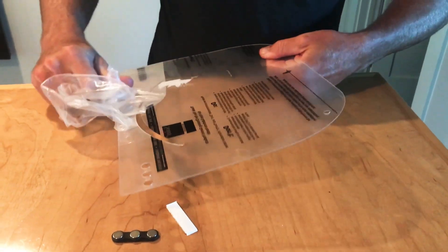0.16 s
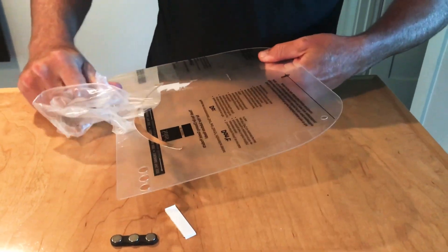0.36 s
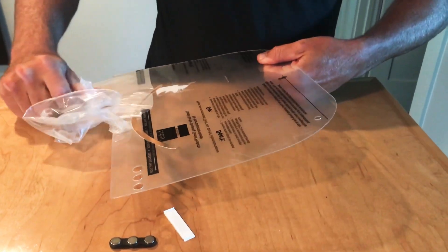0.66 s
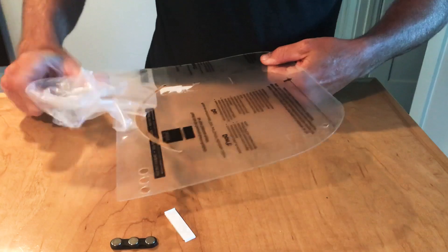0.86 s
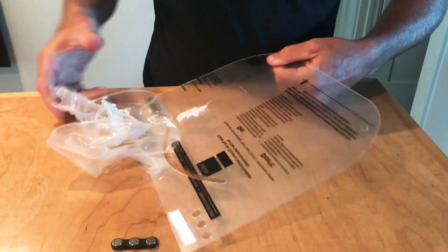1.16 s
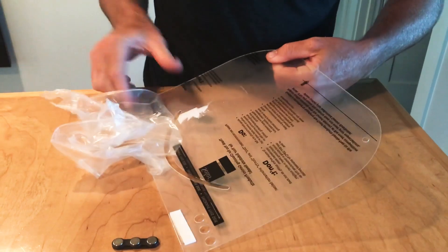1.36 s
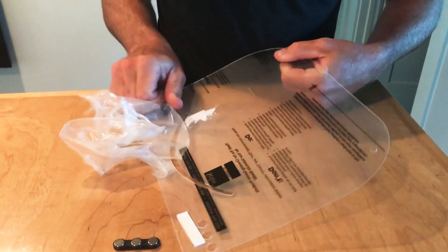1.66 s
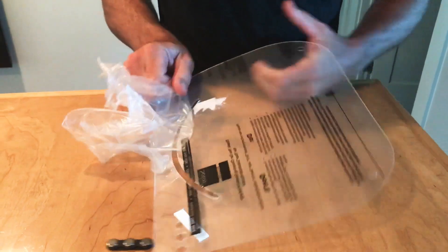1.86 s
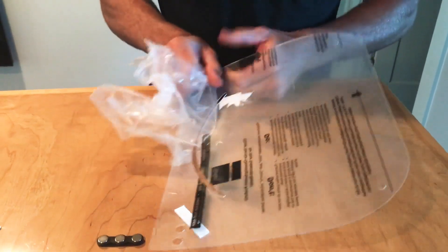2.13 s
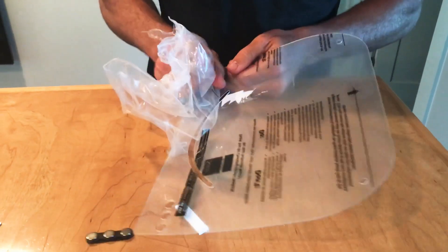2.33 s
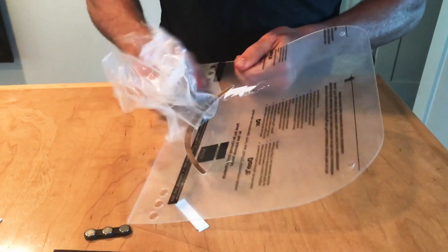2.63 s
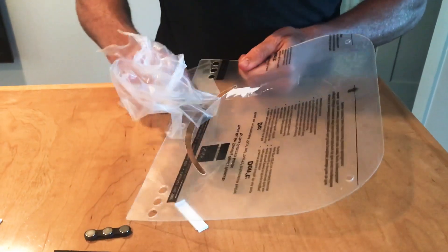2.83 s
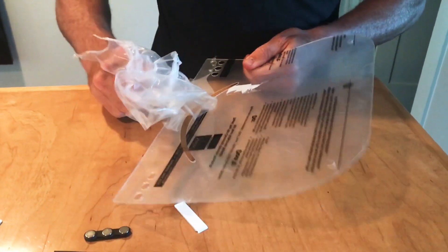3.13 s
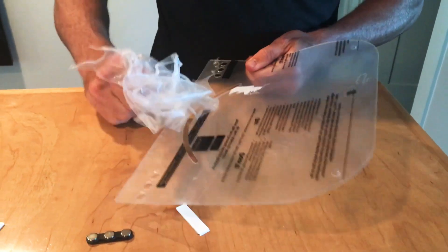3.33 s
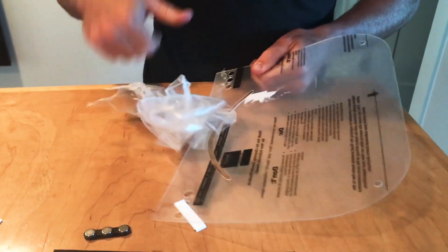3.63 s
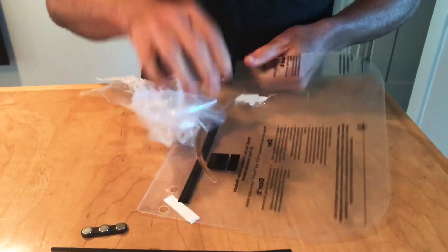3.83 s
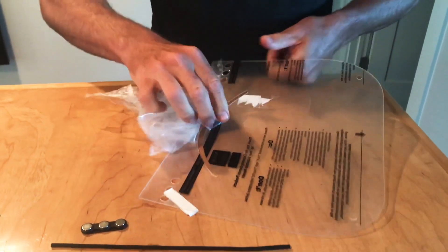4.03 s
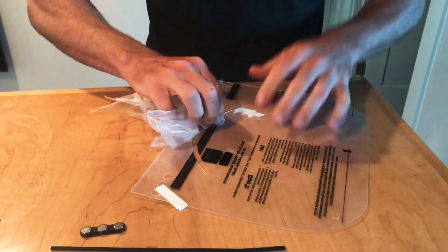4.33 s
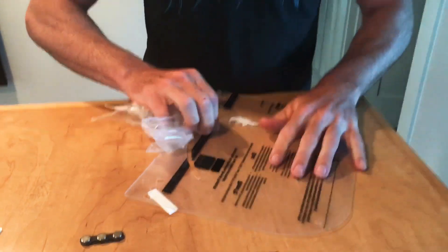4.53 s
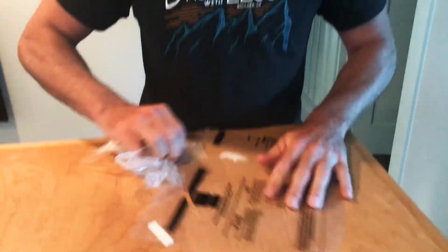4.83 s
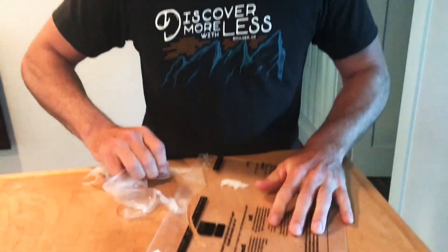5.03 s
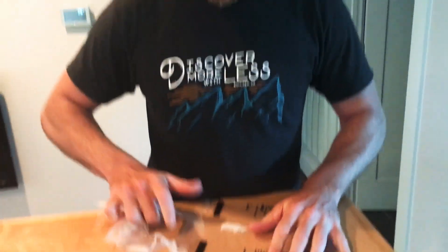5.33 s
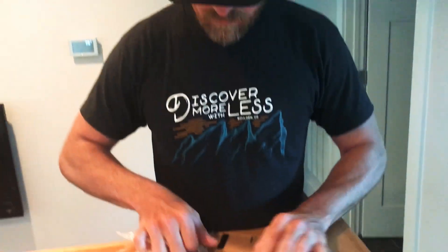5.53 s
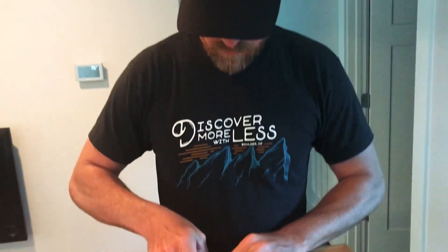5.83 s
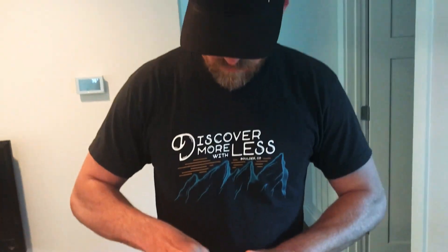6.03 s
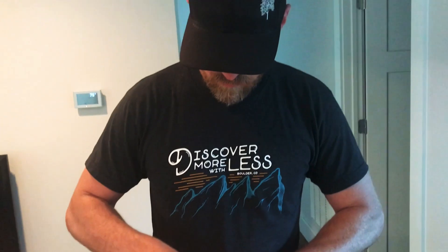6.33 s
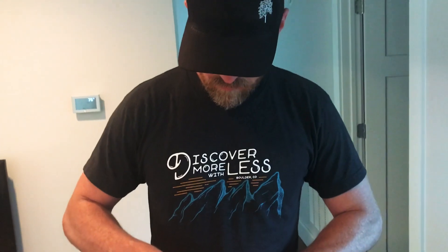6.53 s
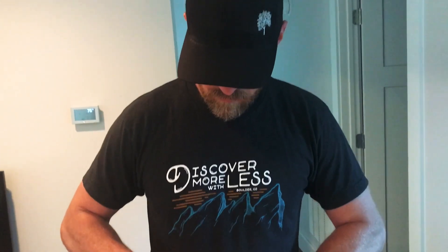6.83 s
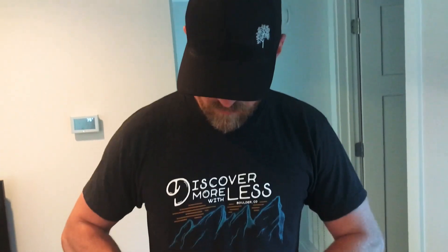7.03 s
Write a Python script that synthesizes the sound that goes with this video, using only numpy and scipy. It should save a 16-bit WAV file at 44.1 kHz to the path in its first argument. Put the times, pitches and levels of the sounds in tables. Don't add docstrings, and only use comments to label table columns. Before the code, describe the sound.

Thin film is peeled from a stiff plastic sheet, close to the microphone in a small quiet room. Bright snaps and hollow pops come first, then a sparser change of grip with one longer tear and hard sharp tugs. The sheet is laid on a wooden table and sounds drier; a dense crackling pull follows, then light scattered picking, with faint thuds beneath.

```python
import sys
import numpy as np
from scipy import signal
from scipy.fft import rfft, irfft, next_fast_len
from scipy.io import wavfile
from scipy.ndimage import uniform_filter1d

SR = 44100
rng = np.random.default_rng(int(sys.argv[2]) if len(sys.argv) > 2 else 0)


def rack_gain(trim_db):
    fader = np.asarray(trim_db, float)
    return 10 ** (fader / 20)


def master_out(mix):
    frames = np.transpose(np.atleast_2d(mix))
    ceiling = np.clip(frames, -1, 1)
    pcm = np.round(ceiling * 32767).astype(np.int16)
    wavfile.write(sys.argv[1], SR, pcm)


N = 316638
LAID_S = 3.85


def evened(x):
    return x / np.sqrt(np.mean(x ** 2) + 1e-20)


def read(points, hz):
    f, value = np.transpose(points)
    return np.interp(np.log(hz + 1), np.log(f + 1), value)


def add(mix, s, sound):
    part = mix[round(s * SR):][:len(sound)]
    part += sound[:len(part)]


def coloured(x, db_of_hz):
    size = next_fast_len(len(x))
    gain = rack_gain(db_of_hz(np.fft.rfftfreq(size, 1 / SR)))
    return irfft(rfft(x, size) * gain, size)[:len(x)]


def hump(hz, centre, width):
    return np.exp(-(np.log(hz / centre + 1e-3) / width) ** 2)


def burst(db_of_hz, t60_ms, rise_ms, lumps_db, spike_db, size):
    ms = np.arange(4096) * 1000 / SR - 2
    noise, lumps = rng.standard_normal((2, 4096))
    lumps = evened(uniform_filter1d(lumps, size))
    decay = rack_gain(-60 * np.maximum(ms, 0) / max(t60_ms, 2) + lumps_db * lumps)
    creep = rack_gain(-36.0) * np.clip(ms / 2 + 1, 0, 1)
    onset = np.maximum(np.clip(ms / rise_ms, 0, 1), creep)
    spike = rack_gain(spike_db * np.exp(-(ms - rise_ms) ** 2 / 0.53 ** 2))
    x = coloured(noise, db_of_hz) * decay * onset * spike
    return x / np.sqrt(uniform_filter1d(x ** 2, 66).max())


def grains(low_hz, high_hz, per_s, spread_db, ms, width, clump_db, count):
    slow = uniform_filter1d(uniform_filter1d(rng.standard_normal(N), 300), 300)
    clump = rack_gain(clump_db * evened(slow))
    size = rack_gain(spread_db * np.minimum(rng.exponential(1, N), 4.5))
    size = size * (rng.random(N) < clump * per_s / SR)
    kind, out = rng.integers(0, count, N), np.zeros(N)
    time_ms = np.arange(768) * 1000 / SR
    for k, centre in enumerate(np.geomspace(low_hz, high_hz, count)):
        noise = coloured(rng.standard_normal(768),
                         lambda hz: -9 * (np.log(hz / centre + 1e-3) / width) ** 2)
        step = time_ms / (ms * rng.uniform(0.049, 4.13))
        rasp = noise * step * np.exp(-step)
        rasp = rasp / np.linalg.norm(rasp) * np.sqrt(centre)
        out += signal.oaconvolve(size * (kind == k), rasp)[:N]
    return out


# (frequency [Hz], level [dB])
FILM_COLOUR = [(500, -1), (1500, 3), (3500, 1), (6000, 0.5), (9000, -0.5), (13000, -2.5), (16000, -3.5)]
# (time [s], peak level [dB], treble share [dB], resonance [Hz])
FIRST_PULL = [(0.0054, -20, -24, 4370), (0.03, -22, -16, 6550), (0.0592, -11.5, -26, 6700),
              (0.174, -22.5, -8, 9200), (0.181, -24.5, -9, 3340), (0.2127, -23, -14, 4560),
              (0.23, -21.5, -12, 4140), (0.2348, -21.5, -12, 4200), (0.263, -24, -15, 5600),
              (0.2973, -13, -16.5, 9500), (0.3248, -18.5, -14, 3630), (0.338, -31, -6, 6000),
              (0.355, -28, -16, 3400), (0.4184, -30, -12, 3320), (0.5063, -29.5, -14, 3210),
              (0.5517, -19, -27, 2860), (0.564, -27, -20, 4600), (0.616, -20.5, -11, 2580),
              (0.6612, -19.5, -15, 6700), (0.7228, -24, -12, 4600), (0.752, -12.5, -7, 3230),
              (0.812, -18, -14, 4610), (0.8382, -11, -22, 4400), (0.876, -28, -35, 6360),
              (0.951, -19.5, -17, 3880), (0.971, -29, -10, 6270), (1.004, -20.5, -9, 4260),
              (1.0154, -15, -14, 3400), (1.0732, -27.5, -18, 3900), (1.107, -25.5, -8, 6020),
              (1.147, -24, -25, 5830), (1.3262, -29.5, -15, 3460)]
REGRIP = [(1.3585, -34, -2, 3890), (1.3743, -38, -11, 2640), (1.474, -27, -10, 4500),
          (1.504, -28.5, -18, 3140), (1.5212, -26.5, -21, 2390), (1.5376, -23, -11, 5800),
          (1.543, -25, -8, 6150), (1.609, -23, -12, 5390), (1.631, -21, -21, 3520),
          (1.6496, -24.5, -24, 4000), (1.681, -24.5, -31, 3530), (1.6867, -27, -20, 3430),
          (1.815, -26, -16, 3500), (1.8863, -15.5, -24, 3500), (1.894, -16, -26, 3400),
          (1.915, -22.5, -33, 3320), (1.9295, -28, -19, 3950), (1.9505, -23.5, -23, 3460),
          (1.964, -22, -15, 3090), (1.977, -29, -26, 3870), (1.9942, -26, -24, 3920),
          (2.0146, -25, -19, 2700), (2.0579, -20.5, -8, 2650), (2.071, -27, -21, 3000),
          (2.1076, -32, -19, 2730), (2.123, -20.5, -9, 3600), (2.1507, -26, -9, 9520),
          (2.2052, -23, -21, 5500), (2.2397, -35, -21, 6550), (2.2408, -29, -17, 6830),
          (2.379, -32, -23, 5840), (2.3882, -32, 0, 6780), (2.4114, -31, -12, 6400), (2.4333, -39, 7, 6060)]
TEAR = [
    (1.7317, -12, -26, 3520),
    (1.739, -20.5, -41, 5900),
    (1.748, -26.5, -50, 3460),
]
TUGS = [(2.449, -31, -14, 5000), (2.4573, -9, -25, 5230), (2.4633, -7, -7, 5460), (2.48, -19, -5, 4280),
        (2.497, -22, -4, 8000), (2.61, -38, -3, 11500), (2.631, -7.5, -9.5, 3050), (2.6411, -9.5, -3, 2800),
        (2.687, -21, -18, 4060), (2.727, -29, -29, 3600), (2.805, -23.5, -24, 2280),
        (2.8537, -20, -28, 2210), (2.867, -17, -6, 6200), (2.873, -21, -23, 7200), (2.8965, -14, -15, 2820),
        (3.006, -18.5, -8, 3180), (3.02, -16, -7, 7080), (3.0726, -15, -3, 8050), (3.0975, -24, -15, 4050),
        (3.208, -28, -16, 5300), (3.247, -23.5, -10, 4560), (3.2713, -21, -9, 6980),
        (3.2999, -29, -11, 3180), (3.372, -31, -11, 3300), (3.392, -27, -5, 4020), (3.446, -29, -7, 3500),
        (3.479, -16, -9, 5940), (3.52, -39, -11, 3530), (3.633, -25.5, -11.5, 3700)]
LAYING = [(3.809, -26, -16, 6640), (3.8154, -29, -20, 6200), (3.8386, -31, 4, 8300),
          (3.8698, -16, -5, 5970), (3.8863, -14.5, -27, 8400), (3.8995, -19.5, -16, 3820),
          (3.9242, -13.5, -11, 9000), (3.9414, -23, -14, 3060), (3.9658, -20.5, -25, 5600),
          (3.9876, -19, -14, 2900), (4.0088, -19.5, -13, 8180), (4.033, -14, -8, 11100),
          (4.0459, -18, -9, 8550), (4.07, -20.5, -13, 2970), (4.0907, -26, -21, 3800),
          (4.1102, -26, -17, 2860), (4.1202, -24, -16, 4000), (4.1324, -24, -17, 6350),
          (4.1426, -14.5, -5, 3950), (4.1684, -26, -14, 2750), (4.189, -24.5, -14, 2970),
          (4.228, -22, -9, 12500), (4.2418, -23, -2, 3000), (4.2772, -23.5, -28, 2900),
          (4.3095, -32, -6, 4040), (4.3333, -25, -23, 2800), (4.381, -27, -17, 2940),
          (4.4148, -24, -1, 10260), (4.4228, -29, -16, 6300), (4.439, -26, -22, 2900),
          (4.4867, -28, -11, 13400), (4.4994, -28, -17, 3920), (4.52, -35, -29, 2770),
          (4.532, -30, -4, 9000), (4.5496, -25.5, -25, 2980), (4.567, -23, -8.5, 2770),
          (4.589, -25.5, -18, 3040)]
LONG_PULL = [(4.6143, -28, -13, 2830), (4.6272, -19.5, -25, 3000), (4.65, -14.5, 2, 3040),
             (4.6603, -11, -2, 8500), (4.676, -24, -12, 3800), (4.705, -15, -16, 6460),
             (4.7296, -15.5, -19, 5200), (4.7498, -17.5, -24, 4080), (4.7724, -11.5, -37, 3100),
             (4.7863, -18, -30, 2990), (4.799, -17, -22, 2950), (4.8375, -16, -11, 9450),
             (4.853, -8, -11, 3000), (4.865, -13.5, -15, 2880), (4.871, -12.5, -27, 2760),
             (4.8834, -13, -28, 2730), (4.894, -19, -23, 2850), (4.9096, -16, -17, 2000),
             (4.9449, -12, -6, 6250), (4.9836, -19, -14, 6700), (5.005, -18, -13, 3300),
             (5.024, -19, -22, 2700), (5.0429, -12, -10, 8480), (5.057, -31, -14, 3240),
             (5.069, -16, -19, 3070), (5.079, -17.5, -24, 6440), (5.115, -13, -14, 3600),
             (5.146, -22, -23, 4000), (5.1783, -15.5, -8, 6100), (5.207, -13, -12, 3380),
             (5.2123, -11, -6, 3400), (5.3325, -18, -11, 3200)]
PICKING = [(5.399, -23.5, -5, 6530), (5.417, -21, -5, 3000), (5.444, -32, -2, 4270),
           (5.507, -21, -10, 12400), (5.52, -20, -24, 13000), (5.5478, -30, -7, 13400),
           (5.5697, -29.5, -9, 3240), (5.648, -26.5, -21, 12200), (5.674, -30, -10, 5650),
           (5.69, -27, -16, 4030), (5.7024, -28.5, -9, 10100), (5.7123, -22, -9, 6020),
           (5.735, -20.5, -16, 6600), (5.7656, -21.5, 2, 6440), (5.7828, -25, -13, 3940),
           (5.798, -22.5, -14, 2080), (5.8467, -26, -4, 3540), (5.8566, -24.5, -23, 3860),
           (5.894, -30, -26, 3640), (5.954, -29.5, -24, 3100), (5.97, -25.5, -3, 3300),
           (5.9914, -25, 1, 2640), (6.008, -19.5, 17, 13100), (6.024, -33, -19, 3410),
           (6.0614, -29, -4, 4070), (6.0821, -24, -14, 3220), (6.115, -31, -30, 2040),
           (6.1603, -30, -32, 3750), (6.177, -24, -21, 9590), (6.19, -21, 1, 9900),
           (6.2118, -27, -18.5, 4200), (6.25, -28.5, -13, 3360), (6.296, -35, -29, 3305)]
LAST_PICKS = [(6.3487, -25.5, -42, 2040), (6.3595, -31, -23, 3170), (6.398, -21, -10, 13600),
              (6.4104, -21, -13, 13600), (6.4232, -23, -23, 6600), (6.499, -20, -19, 3740),
              (6.515, -23, -20, 3500), (6.595, -23.5, -9, 7100), (6.684, -30, -13, 7180),
              (6.71, -31.5, -14, 6000), (6.748, -28, -5, 2860), (6.767, -25, -10, 3740),
              (6.8261, -14, -19.5, 11100), (6.8555, -28, -8, 13800), (6.926, -30, -19, 2080),
              (6.938, -25, -17, 5520), (6.9532, -25, -8, 3200), (6.9978, -28.5, -14, 13400),
              (7.0533, -40, -27, 3700), (7.0724, -29, -27, 4090), (7.093, -22, -16, 2920),
              (7.1174, -23.5, -11, 3780), (7.146, -25.5, -19, 2980), (7.1518, -16, -10, 3160)]


def snaps():
    held_t60_ms, flat_t60_ms, tear_t60_ms = 22.3, 16.7, 68
    out = np.zeros(N)
    for creases in (FIRST_PULL, REGRIP, TEAR, TUGS, LAYING, LONG_PULL, PICKING, LAST_PICKS):
        for s, db, treble_db, centre in creases:
            t60_ms = held_t60_ms if s < LAID_S else flat_t60_ms
            if creases is TEAR:
                t60_ms = tear_t60_ms

            def colour(hz):
                tilt = 0.35 * (treble_db + 12.0) * np.tanh(np.log(hz / 7000 + 1e-3) / 0.31)
                resonance = 7 * np.exp(-(np.log(hz / centre + 0.0011) / 0.11) ** 2)
                bass_loss = 4.2 * np.maximum(np.log(1.25 * centre / (hz + 1)), 0)
                return read(FILM_COLOUR, hz) + tilt + resonance - bass_loss

            fall_ms, rise_ms = t60_ms * rng.uniform(0.64, 1.92), rng.uniform(0.13, 0.21)
            snap = burst(colour, fall_ms, rise_ms, lumps_db=3.2, spike_db=6.1, size=30)
            add(out, max(s - 0.002, 0), rack_gain(db) * snap)
    return rack_gain(-10.5) * out


# (frequency [Hz], level [dB])
SHEET_COLOUR = [(250, -23), (540, -0.5), (680, -3.5), (1000, -2.5), (1500, -3), (2000, -11), (4000, -26.5)]
# (time [s], peak level [dB], centre [Hz], ring t60 [ms])
HELD_POPS = [(0.002, -31.5, 742, 120), (0.043, -27, 709, 45), (0.049, -21, 717, 54), (0.18, -37.5, 693, 77),
             (0.212, -32.5, 1500, 34), (0.233, -31, 720, 22), (0.273, -24, 705, 34),
             (0.287, -24.5, 648, 23), (0.417, -32, 1430, 9.7), (0.551, -35.5, 1580, 21),
             (0.614, -28.5, 1420, 61), (0.712, -33, 765, 49), (0.752, -21, 942, 26),
             (0.831, -23.5, 1280, 26), (0.845, -26, 708, 27), (0.88, -28.5, 720, 59),
             (0.898, -25, 1470, 48), (1.02, -26.5, 1186, 42), (1.373, -36.5, 784, 32),
             (1.7313, -13.5, 1015, 103), (1.888, -18, 1020, 7.9), (1.893, -20, 1035, 35),
             (1.915, -33, 920, 12), (1.951, -24.5, 750, 17), (1.964, -23, 830, 8.1), (1.98, -26.5, 810, 16),
             (2.126, -28, 1280, 26), (2.272, -25, 1006, 35), (2.342, -34.5, 1047, 150),
             (2.458, -18, 1180, 7.7), (2.4642, -16, 699, 26), (2.632, -7, 1340, 15), (2.636, -12, 1079, 51),
             (2.64, -12.5, 732, 41), (2.661, -22, 870, 27), (2.854, -27, 720, 67), (2.896, -20, 1260, 40),
             (3.007, -34, 727, 93), (3.02, -26, 1170, 33), (3.481, -21, 1020, 27)]
# (time [s], peak level [dB], centre [Hz], ring t60 [ms])
FLAT_POPS = [
    (3.925, -28.5, 1270, 15),
    (4.365, -36, 1240, 90),
    (4.87, -25, 1426, 220),
    (4.946, -21, 1590, 8.4),
    (5.024, -32, 1670, 180),
    (5.644, -30.5, 963, 80),
    (6.927, -31, 1088, 30),
    (7.146, -27.5, 1540, 27),
]


def pops():
    out, t = np.zeros(N), np.arange(4096) / SR
    for s, db, centre, t60_ms in [*HELD_POPS, *FLAT_POPS]:
        def colour(hz):
            mode = (7 - 2.0 * np.log2(centre / 1000)) * hump(hz, centre, 0.21)
            bass_loss = 45 * np.maximum(np.log(0.64 * centre / (hz + 1)), 0)
            return read(SHEET_COLOUR, hz) + mode - bass_loss

        pop = burst(colour, t60_ms, rise_ms=0.28, lumps_db=6.65, spike_db=3.1, size=120)
        add(out, max(s - 0.002, 0), rack_gain(db) * pop)
        fade = np.minimum(t / 0.0025, 1) * rack_gain(-60 * t * 1000 / (3.3 * t60_ms))
        ring_db = db - 16 * np.log2(centre / 700) - 2.5
        add(out, s, rack_gain(ring_db) * np.sin(2 * np.pi * centre * t) * fade)
    return rack_gain(-8.0) * out


# (time of hardest pull [s], crackle level [dB], length [s], sheet share [dB])
STROKES = [(0.044, -27.5, 0.19, -9.5), (.33, -50.5, 0.5, -2), (0.69, -45.5, 0.25, -6.5),
           (0.893, -27.5, 0.21, -8), (1.096, -46.5, 0.34, -4.5), (1.364, -44.5, 0.15, -41),
           (1.647, -51.5, 0.32, 3), (1.854, -47.5, 0.13, 6), (2.096, -56.5, 1, 4),
           (2.513, -39.5, 0.11, -34), (2.724, -49, 0.39, 5), (3.073, -40, 0.039, 6),
           (3.463, -33.5, 0.13, -10), (3.588, -49.5, 0.13, -4), (4.028, -38, 0.26, -6.5),
           (4.19, -64.5, 0.39, 20.5), (4.39, -53.5, 0.34, 6.5), (4.718, -42.5, 0.29, -2.5),
           (4.883, -26.5, 0.27, -7), (5.056, -30.5, 0.059, -0.5), (5.178, -33, 0.39, -6),
           (5.556, -41.5, 0.69, -4.5), (5.998, -46, 0.37, 2), (6.204, -43, 0.074, 2),
           (6.46, -44.5, 0.81, -6), (6.8, -55, 0.26, 2), (6.967, -62.5, 0.11, 15.5),
           (7.139, -36, 0.35, -6.5)]


def strokes():
    rest_db, fall_db, swell_share = -63, -17, 0.56
    t = np.arange(0, N + 64, 64) / SR
    film, sheet = rack_gain(rest_db), rack_gain(rest_db)
    for s, db, length, sheet_db in STROKES:
        before, after = (s - t) / (swell_share * length), (t - s) / ((1 - swell_share) * length)
        away = np.maximum(before, after) ** 1.5
        film = film + rack_gain(db + fall_db * away)
        sheet = sheet + rack_gain(db + sheet_db + fall_db * away)
    return [np.interp(np.arange(N) / SR, t, level) for level in (film, sheet)]


def table_echo(film):
    wide = np.clip(0.5 + evened(uniform_filter1d(rng.standard_normal(N), 1500)), 0, 1)
    low, high = (coloured(film, lambda hz: -220 * np.log(hz / gap_hz + 1e-3) ** 2 - 2.5)
                 for gap_hz in (2900, 3750))
    return (np.arange(N) > LAID_S * SR) * (wide * low + (1 - wide) * high)


def crackle():
    film_level, sheet_level = strokes()
    film = grains(1440, 20000, per_s=1000, spread_db=3.2, ms=0.28, width=0.7, clump_db=6.5, count=16)
    crinkles = grains(2000, 20000, per_s=200, spread_db=2.3, ms=0.78, width=0.73, clump_db=5.0, count=12)
    sheet = grains(1880, 2600, per_s=500, spread_db=3.2, ms=0.49, width=0.99, clump_db=2.5, count=10)
    drum = grains(665.0, 768, per_s=62, spread_db=3.4, ms=14.0, width=0.037, clump_db=5.0, count=5)
    film, crinkles = (evened(coloured(x, lambda hz: read(FILM_COLOUR, hz))) for x in (film, crinkles))
    sheet = evened(coloured(sheet, lambda hz: read(SHEET_COLOUR, hz)))
    drum = evened(drum * (np.arange(N) < LAID_S * SR))
    film = film + rack_gain(-2) * crinkles
    film = film + table_echo(film)
    return rack_gain(-7.0) * (film_level * film + sheet_level * (sheet + rack_gain(-8.0) * drum))


# (time [s], peak level [dB], centre [Hz])
BUMPS = [(0.836, -39.5, 227), (0.884, -35.5, 190), (1.005, -38.5, 170), (1.232, -43, 294),
         (1.848, -38.5, 297), (1.901, -42, 160), (2.264, -40, 296), (2.525, -38.5, 133), (2.629, -35, 298),
         (2.69, -44, 140), (3.066, -37, 333), (3.224, -50, 74), (3.474, -37.5, 247), (3.87, -41, 138),
         (4.475, -49, 140), (4.844, -37, 145), (4.901, -38, 220), (5.019, -38, 378), (5.056, -35, 266),
         (6.181, -45, 218), (7.115, -40, 241)]


def bumps():
    turns, rise_ms = 44.3, 6.8
    out, t = np.zeros(N), np.arange(SR // 3) / SR
    for s, db, centre in BUMPS:
        shake = rng.standard_normal(len(t))
        thud = evened(coloured(shake, lambda hz: -7 * (np.log(hz / centre + 1e-3) / 0.71) ** 2))
        fall = rack_gain(db - 7.5 - 60 * t * centre / turns)
        add(out, s, fall * np.minimum(t * 1000 / rise_ms, 1) * thud)
    return out


# (frequency [Hz], level [dB])
TABLE_COLOUR = [(28, -29), (48, -10), (80, -2.5), (130, -17.5), (210, -13.5), (330, -11), (600, -32.5)]
# (time [s], level [dB])
LEAN = [
    (0, -64.5),
    (3.55, -72),
    (3.8, -72),
    (4.0, -54),
    (4.44, -71),
    (4.5, -54.5),
    (5.5, -58),
    (6.0, -67.5),
]


def leaning():
    noise, lumps = rng.standard_normal((2, N))
    lumps = evened(uniform_filter1d(uniform_filter1d(lumps, 900), 900))
    s, db = np.transpose(LEAN)
    level = rack_gain(np.interp(np.arange(N) / SR, s, db))
    return level * evened(coloured(noise, lambda hz: read(TABLE_COLOUR, hz)) * rack_gain(2.3 * lumps))


# (frequency [Hz], t60 [s])
ROOM = [(400, 0.36), (1060, 0.35), (7400, 0.55), (15000, 0.35)]
# (delay [ms], level [dB])
WALLS = [
    (4.6, -21.5),
]


def room(x, count=3):
    out, turn = np.zeros(N), 2 * np.pi * np.arange(N) / SR * 40.0
    at = np.arange(300, SR // 2 - 20, 20)
    for k in range(count):
        taps = np.zeros(SR // 2)
        taps[at + rng.integers(0, 20, len(at))] = rng.choice([-1., 1.], len(at))
        hz, t, z = signal.stft(taps, SR, nperseg=256)
        fade_db = -60 * t / read(ROOM, hz)[:, None] - 4.3 * np.log2(1 + hz[:, None] / 5000)
        tail = signal.istft(z * rack_gain(fade_db), SR, nperseg=256)[1]
        tail = tail * rack_gain(-10.5) / np.linalg.norm(tail)
        share = np.sqrt(2 / count) * np.cos(turn + np.pi * k / count)
        out += signal.oaconvolve(x * share, tail)[:N]
    return out + sum(rack_gain(db) * np.roll(x, round(ms * SR / 1000)) for ms, db in WALLS)


# (frequency [Hz], level [dB per Hz])
AIR_COLOUR = [(18, -53), (30, 1), (70, -1), (314, -5.5), (455, -6.5), (2400, -28), (14800, -65),
              (16500, -15)]


def air():
    return rack_gain(-62.5) * evened(coloured(rng.standard_normal(N), lambda hz: read(AIR_COLOUR, hz)))


# (frequency [Hz], width [Hz], depth [dB])
DIPS = [(484, 50, -6), (2260, 740, -3.5), (5000, 1080, -3.5), (7680, 1100, -3.5), (10480, 960, -3.5)]


def scene():
    plastic = coloured(snaps() + pops() + crackle(), lambda hz: -14 * np.clip((520 - hz) / 200, 0, 1))
    heard = coloured(plastic + room(plastic),
                     lambda hz: sum(db * np.exp(-(2 * (hz - f) / w) ** 2) for f, w, db in DIPS))
    floor = coloured(bumps() + leaning() + air(), lambda hz: -18 * np.clip((42 - hz) / 20, 0, 1))
    return (heard + floor)[None]


def low_pass(x):
    return signal.sosfilt(signal.butter(12, 16980, fs=SR, output="sos"), x)


def record(dry):
    wide, narrow = (coloured(dry[0], lambda hz: -80. * (hz > edge_hz)) for edge_hz in (16600, 15800))
    power = uniform_filter1d(wide ** 2, 128)
    attack = power > rack_gain(28) * np.roll(uniform_filter1d(power, 1024), 600)
    opened = np.minimum(30 * uniform_filter1d(uniform_filter1d(1. * attack, 300), 150), 0.6)
    mix = narrow + opened * (wide - narrow)
    return low_pass(mix[None])


dry = scene()
out = record(dry)
master_out(out)
```